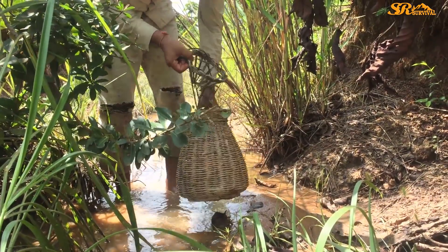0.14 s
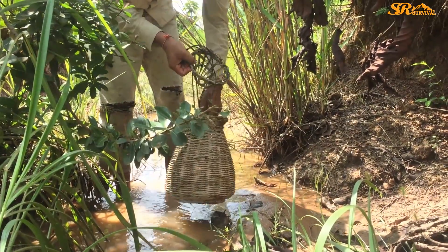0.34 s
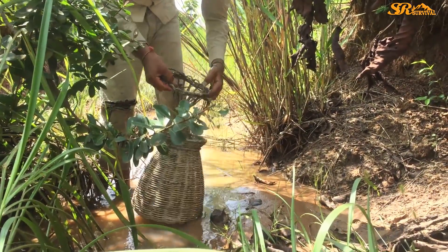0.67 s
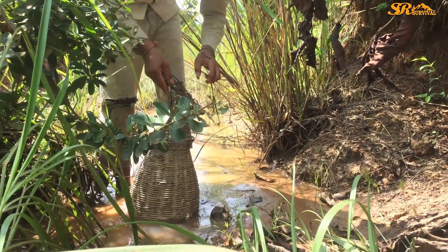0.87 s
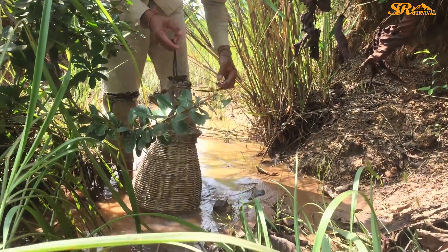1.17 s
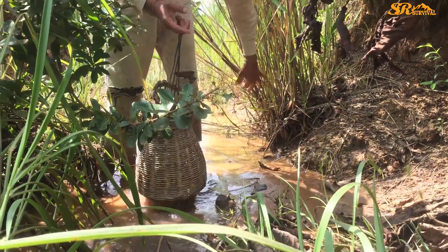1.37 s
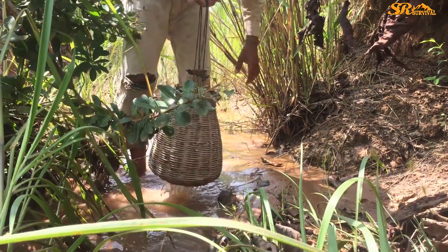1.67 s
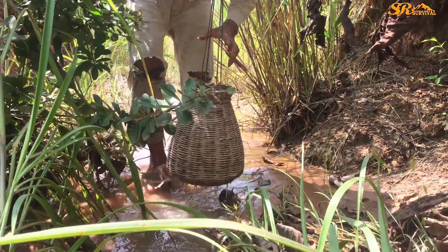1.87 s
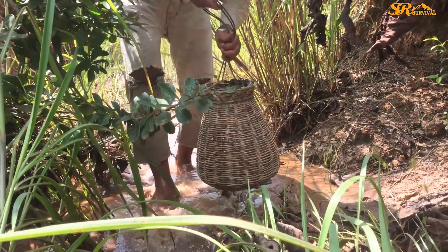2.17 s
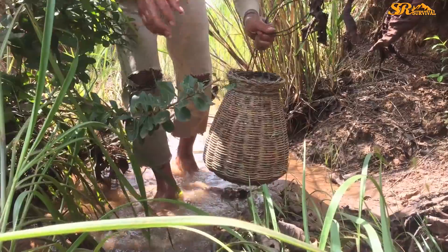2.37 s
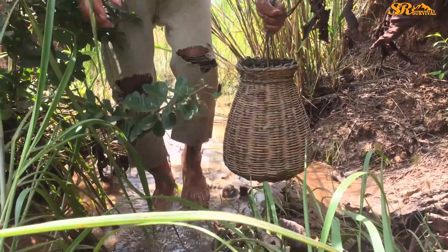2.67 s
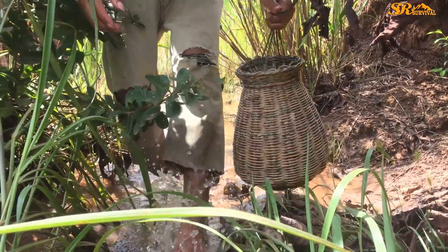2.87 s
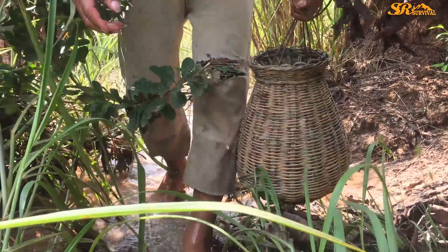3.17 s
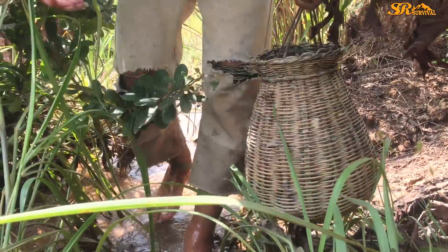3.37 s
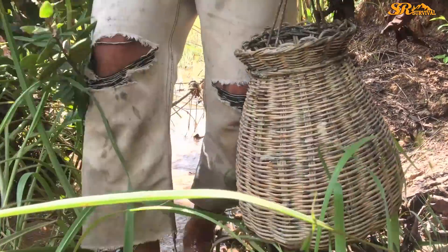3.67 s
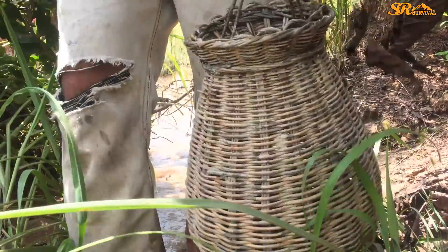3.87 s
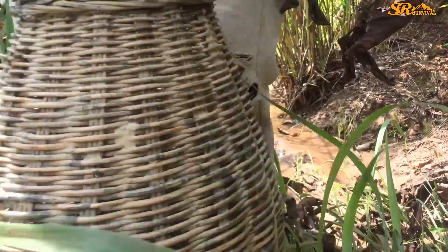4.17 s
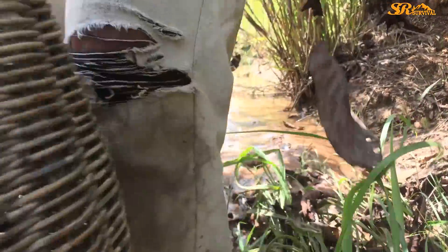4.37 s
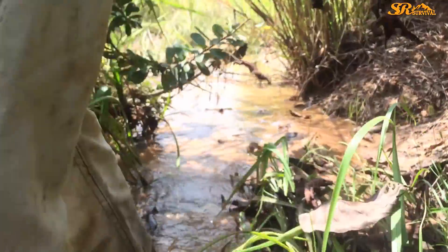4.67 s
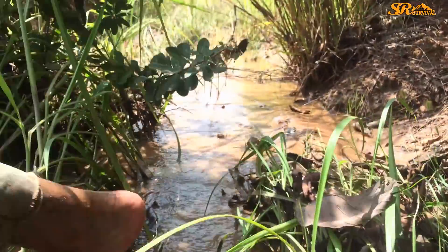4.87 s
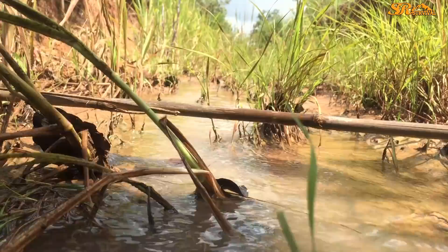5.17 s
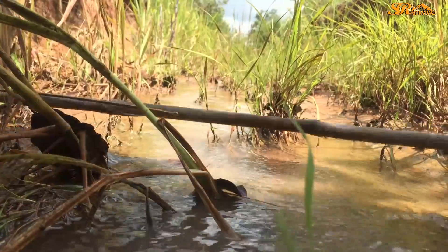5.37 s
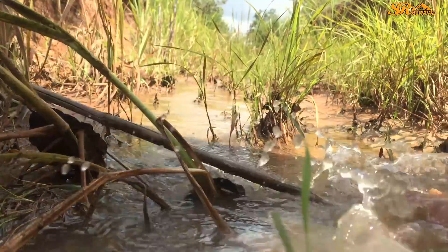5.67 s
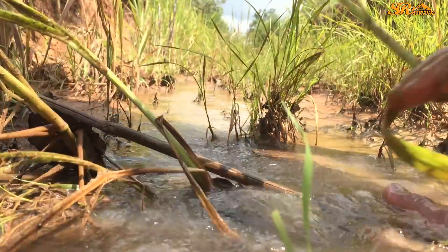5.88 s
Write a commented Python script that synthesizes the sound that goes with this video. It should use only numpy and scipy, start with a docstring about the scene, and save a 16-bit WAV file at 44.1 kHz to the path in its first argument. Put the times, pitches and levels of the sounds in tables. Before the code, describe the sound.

Sparse snaps and splashes build into busy wading past the microphone, followed by a quieter spot and one sharp crackling stem crush with a wet splash.

```python
"""Wading through a muddy ditch

Bare feet wade through shallow water between grass, a wicker basket in hand; a foot crushes reeds at the end.
Gliding sines make the bubbles and the mud's gulp; crowds of them make slosh, and with hiss they make spray.
Filtered noise bursts make snaps, splashes and dull knocks; short damped rings make cracks.
Far off a one-cylinder engine chugs in low thumps, over an outdoor hush of coloured noise."""
import sys
import numpy as np
from scipy import signal
from scipy.fft import rfft, irfft
from scipy.io import wavfile
from scipy.ndimage import uniform_filter1d

SR = 44100
rng = np.random.default_rng(int(sys.argv[2]) if len(sys.argv) > 2 else 0)


def master(y):
    """Save y as 16-bit WAV."""
    cut = np.clip(np.atleast_2d(y).T, -1, 1)
    pcm = np.round(cut * 32767)  # scale
    wavfile.write(sys.argv[1], SR, pcm.astype(np.int16))


N = 266364  # length in samples
SCENE_CHANGE_S = 5.28  # from here on the scene changes: a different hush, with surges of its own


def gain_of(db):
    """Turns decibels into an amplitude factor."""
    return 10 ** (np.asarray(db) / 20)


def evened(x):
    """Scales a signal to an RMS (average strength) of one."""
    return x / np.sqrt(np.mean(x ** 2) + 1e-20)


def add(mix, start_s, sound):
    """Adds a sound to the mix in place, cut off where the mix ends."""
    start = round(start_s * SR)
    part = mix[start:][:len(sound)]
    part += sound[:len(part)]


def coloured(x, spectrum):
    """Filters x by a spectrum of (pitch_hz, level_db) points, then evens its strength."""
    hz, db = np.transpose(spectrum)
    bins_hz = np.fft.rfftfreq(len(x), 1 / SR)
    curve_db = np.interp(np.log(bins_hz + 1), np.log(hz + 1), db)
    return evened(irfft(rfft(x) * gain_of(curve_db), len(x)))


def smooth_noise(samples):
    """Slow random ups and downs: noise averaged over a number of samples."""
    return evened(uniform_filter1d(rng.standard_normal(N), size=samples))


def clicks(per_s, spread_db):
    """Sparse random impulses, most small and a few large."""
    size = gain_of(spread_db * np.minimum(rng.exponential(1, N), 4))
    sign = rng.choice([-1, 1], N)
    return size * sign * (rng.random(N) < per_s / SR)


def bubble(hz, width_ms, glide, rough=0):
    """A sine under a bell that rises faster than it dies; the pitch glides by so many octaves per width."""
    # Time counted in widths, with the bell's peak in the middle of the array
    u = np.arange(-1.5 * width_ms * SR // 1000, 1.494 * width_ms * SR // 1000) * 1000 / SR / width_ms
    noise = rng.standard_normal((2, 8192))
    wobble = evened(uniform_filter1d(noise, size=round(SR / hz)))[:, :len(u)]
    bell = np.exp(-np.where(u < 0, 6.0, 2.2) * u ** 2) * (1 + rough * wobble[0])
    pitch_hz = hz * 2 ** (glide * u + 0.37 * rough * wobble[1])
    return bell * np.sin(2 * np.pi * np.cumsum(pitch_hz) / SR)


def air():
    """Outdoor hush as coloured noise that swells a little and changes with the scene."""
    # Tone of the hush and engine drone in the first scene: pitch_hz [Hz], level_db [dB per Hz]
    first_spectrum = [(25, -20), (60, -4.5), (100, -13), (150, -2), (190, -17.5), (230, -22.5),
                      (330, -21.5), (500, -30), (1000, -28.5), (2500, -31), (5000, -52), (10000, -45),
                      (16000, -36.5)]
    # Loudness of that hush over time: time_s [s], level_db [dB]
    first_levels = [(0, -62), (3, -62.5), (4.5, -60), (5.27, -54.5)]
    # Tone of the hush in the second scene: pitch_hz [Hz], level_db [dB per Hz]
    second_spectrum = [(30, -21), (70, -11), (150, -1.5), (220, -6), (300, -18), (1500, -17), (2500, -36),
                       (16000, -24)]
    second_db = -56
    t = np.arange(N) / SR
    swell = gain_of(4.05 * smooth_noise(3000))
    first_db = np.interp(t, *np.transpose(first_levels))
    first = gain_of(first_db) * coloured(rng.standard_normal(N), first_spectrum)
    second = gain_of(second_db) * coloured(rng.standard_normal(N), second_spectrum)
    later = np.clip((t - SCENE_CHANGE_S) / 0.044, 0, 1)  # a quick crossfade
    return swell * ((1 - later) * first + later * second)


def surging():
    """Slosh dB, bubble pitch in octaves and rustle dB at every sample; overlapping surges add their power."""
    # Surges of water round feet and basket: start_s [s], length_s [s], slosh_db [dB],
    # commonest bubbles at first_hz [Hz] and at last_hz [Hz], spray and leaf rustle spray_db [dB]
    surges = [(0.375, 0.13, -52, 900, 1100, -63), (0.897, 0.037, -50, 1500, 1690, -49.5),
              (1.004, 0.24, -56.5, 1560, 1570, -67), (1.483, 0.057, -53, 1010, 1410, -71),
              (1.649, 0.13, -45, 1500, 900, -60), (1.999, .16, -47, 1230, 1220, -57),
              (2.186, 0.091, -47, 700, 1110, -52.5), (2.301, 0.16, -38.5, 870, 1070, -48.5),
              (2.513, 0.049, -61, 1900, 1900, -52.5), (2.617, 0.032, -53, 1300, 1200, -70),
              (2.69, 0.062, -45.5, 1080, 860, -57.5), (2.796, 0.1, -57.5, 1210, 1800, -63.5),
              (2.953, 0.16, -45.5, 920, 1590, -49), (3.202, .15, -43.5, 1820, 1310, -43),
              (3.47, 0.09, -39.5, 1280, 1330, -48), (3.6, 0.17, -47.5, 1600, 1400, -48),
              (3.784, 0.14, -35, 1760, 630, -40.5), (3.983, 0.11, -39, 1380, 1830, -41.5),
              (4.123, 0.22, -46, 1480, 1700, -44), (4.331, 0.19, -35, 1300, 950, -42.5),
              (4.571, 0.21, -35, 1240, 1410, -42), (4.838, 0.22, -43, 1560, 1300, -52),
              (5.048, 0.051, -45.5, 780, 800, -48), (5.113, .13, -51, 1300, 1500, -54),
              (5.29, 0.12, -57, 990, 800, -84), (5.412, 0.12, -55, 800, 900, -58),
              (5.609, 0.12, -54, 990, 1200, -47), (5.705, 0.041, -30.5, 1530, 1300, -42.5),
              (5.815, 0.12, -49, 1200, 1280, -51.5), (6.003, 0.072, -64, 900, 950, -48)]
    # Each surge swells, then weakens while it lasts; afterwards the spray lingers longer
    slosh_swell_db_per_s, spray_swell_db_per_s, droop_db = 400, 198, 3.5
    slosh_fall_db_per_s, spray_fall_db_per_s = 356, 90
    still_slosh_db, still_rustle_db = -77, -71.5
    start, length, slosh_db, first_hz, last_hz, spray_db = np.transpose(surges)[:, :, None]
    t = np.arange(0, N, step=32) / SR
    before = np.maximum(start - t, 0)
    done = np.clip((t - start) / length, 0, 1)
    after = np.maximum(t - start - length, 0)
    here = (start < SCENE_CHANGE_S) == (t < SCENE_CHANGE_S)  # each scene hears only its own surges
    water_db = slosh_db - slosh_swell_db_per_s * before - droop_db * done - slosh_fall_db_per_s * after
    mist_db = spray_db - spray_swell_db_per_s * before - droop_db * done - spray_fall_db_per_s * after
    # Doubled decibels give power instead of amplitude
    water = here * gain_of(2 * water_db) + gain_of(2 * still_slosh_db) / len(surges)
    spray = (here * gain_of(2 * mist_db)).sum(axis=0) + gain_of(2 * still_rustle_db)
    # The strongest surge has most say in the pitch
    octaves = np.log2(first_hz * (last_hz / first_hz) ** done)
    octave = (water * octaves).sum(axis=0) / water.sum(axis=0)
    controls = 10 * np.log10(water.sum(axis=0)), octave, 10 * np.log10(spray)
    return [np.interp(np.arange(N) / SR, t, control) for control in controls]


def slosh(level_db, octave):
    """Small bubbles, sparse in a trickle and crowded in a rush; sizes gather round the pitch the stride sets free."""
    out = np.zeros(N)
    per_s = np.clip(45 * gain_of(.6 * (level_db + 46.0)), 25, 110)
    for hz in np.geomspace(280, 7000, num=36):
        above = np.log2(hz) - octave
        share = np.exp(-.5 * (above / np.where(above > 0, 1.1, .6)) ** 2)  # small bubbles outnumber large ones
        width_ms = 1000 * rng.uniform(3.5, 11) / hz
        ring = bubble(hz, width_ms, rng.uniform(-0.047, 0.25), rough=0.17)
        starts = clicks(per_s, 3.84) * share / np.sqrt(per_s)
        out += signal.oaconvolve(starts, ring / np.linalg.norm(ring), "same")
    flutter = gain_of(2.78 * smooth_noise(900))
    return gain_of(level_db) * evened(out * flutter)


def rustle(level_db):
    """Spray and brushed leaves: a hiss that comes in clumps, with tiny droplets pinging in it."""
    # Tone of the rustle: pitch_hz [Hz], level_db [dB per Hz]
    rustle_spectrum = [(710, -13.5), (1200, -12), (1430, -9), (2450, -1.5), (2790, -11), (3290, -4.5),
                       (7570, -12.5), (11600, -15.5), (16000, -19.5)]
    clumps = gain_of(2.35 * smooth_noise(400))
    drops = np.zeros(N)
    for hz in np.geomspace(1800, 11000, num=14):
        ping = bubble(hz, 1000 * rng.uniform(3.91, 12) / hz, rng.uniform(0, 0.12))
        drops += signal.oaconvolve(clicks(40, 4.1), np.sqrt(hz) * ping / np.linalg.norm(ping), "same")
    hiss = clumps * rng.standard_normal(N)
    return gain_of(level_db) * coloured(hiss + 0.43 * evened(drops), rustle_spectrum)


def burst(db, hz, fade_s, treble_db):
    """Splinters or spray as noise through the broad resonance of what gives way; long bursts swell slower."""
    t = np.arange(round(fade_s * SR)) / SR
    noise = rng.standard_normal((2, SR // 4))
    uneven = gain_of(2.6 * evened(uniform_filter1d(noise[1], size=90)))
    envelope = (1 - np.exp(-t / (0.021 * fade_s))) * gain_of(-60 * t / fade_s)
    grains = (noise[0] * uneven)[:len(t)] * envelope
    body_band = signal.butter(N=2, Wn=[hz / 1.76, hz * 1.79], btype="band", fs=SR, output="sos")
    body = signal.sosfilt(body_band, grains)
    treble = signal.lfilter(*signal.butter(N=1, Wn=[3000, 10000], btype="band", fs=SR), grains)
    sound = evened(body) + gain_of(treble_db) * evened(treble)
    return gain_of(db) * sound / abs(sound).max()


def add_snaps(mix):
    """Dry stems, leaves and wicker give way in bursts with treble about as strong as the body."""
    # Snaps: start_s [s], peak_db [dB], body pitch_hz [Hz], fade_s [s to fall by 60 dB]
    snaps = [(.034, -47.5, 5000, .025), (.135, -39, 2540, 0.065), (.175, -45, 2900, .062),
             (.208, -33, 760, 0.044), (.223, -33.5, 2550, .064), (.297, -43, 3400, 0.028),
             (.346, -43, 2020, 0.035), (.391, -28, 930, 0.047), (.455, -27.5, 1300, 0.086),
             (.538, -32, 1100, 0.049), (.831, -39, 2160, .21), (.915, -31, 1320, 0.07),
             (.972, -35.5, 2380, 0.043), (1.042, -45, 2670, 0.032), (1.076, -42, 8000, 0.027),
             (1.088, -35, 2980, 0.062), (1.104, -34, 6900, 0.093), (1.24, -36, 4600, .025),
             (2.141, -33, 1580, 0.058), (2.391, -33.5, 2770, .037), (2.604, -31.5, 5500, 0.044),
             (2.983, -34, 845, 0.082), (3.146, -28.5, 5470, 0.12), (3.247, -25, 5030, 0.14),
             (3.364, -37.5, 3680, 0.05), (3.499, -22.5, 1310, 0.16), (3.708, -27.5, 4200, 0.091),
             (3.991, -25, 1470, 0.088), (4.052, -23, 2540, 0.22), (4.484, -26, 2250, .029),
             (4.789, -23, 1900, 0.14), (5.7215, -4.5, 6470, 0.021), (5.739, -16.5, 2050, 0.024),
             (5.786, -22, 5030, 0.021), (5.7945, -13, 3900, .03), (5.878, -27.5, 1160, 0.024),
             (5.991, -36, 786, 0.2)]
    for start_s, peak_db, pitch_hz, fade_s in snaps:
        add(mix, start_s, burst(peak_db, pitch_hz, fade_s, treble_db=-0.5))


def engine():
    """Each firing sends two or three cycles of the exhaust note, with a weak overtone."""
    # Engine speed over time: time_s [s], speed [firings per s]
    speeds = [(0, 6.845), (2.98, 6.845), (4.1, 7.48), (6.1, 7.49)]
    # Loudness as carried by the wind, with deep dips where the engine misfires: time_s [s], peak_db [dB]
    levels = [(0, -53), (.8, -50), (1.15, -44.5), (1.45, -57), (1.75, -50), (2.1, -55), (2.3, -45),
              (2.55, -49), (2.8, -56), (3.2, -44.5), (3.7, -44), (4.35, -42.5), (4.65, -56), (4.8, -47.5),
              (5.2, -43.5)]
    exhaust_hz, width_ms = 76.7, 26.75
    uneven_db = 1  # typical random difference from firing to firing
    t = np.arange(.06, 5.2, 1 / SR)  # seconds over which it is heard
    turns = np.cumsum(np.interp(t, *np.transpose(speeds))) / SR
    times = np.interp(np.arange(int(turns[-1]) + 1), turns, t)  # one firing per whole count
    detune = rng.uniform(0.908, 1.11, (len(times), 2))
    levels_db = np.interp(times, *np.transpose(levels)) + uneven_db * rng.standard_normal(len(times))
    out = np.zeros(N)
    for middle_s, db, (low, high) in zip(times, levels_db, detune):
        note = bubble(exhaust_hz * low, width_ms, 0)
        overtone = bubble(2 * exhaust_hz * high, width_ms, 0)
        thump = note + 0.1 * overtone
        add(out, middle_s - len(thump) / 2 / SR, gain_of(db) * thump)
    return out


def knock(db, hz, fade_s):
    """A soft blow: low noise that dies in a wide, hollow resonance."""
    t = np.arange(round(fade_s * SR)) / SR
    envelope = gain_of(-60 * t / fade_s) * (1 - np.exp(-t / 0.0014))
    push = rng.standard_normal(SR // 4)[:len(t)] * envelope
    hollow = signal.butter(N=2, Wn=[hz / 3.5, hz * 2.0], btype="band", fs=SR, output="sos")
    thud = signal.sosfilt(hollow, push)
    return gain_of(db) * thud / abs(thud).max()


def add_knocks(mix):
    """The basket and feet on mud knock dully; the faint 55 Hz row is a lone deep thump."""
    # Knocks: start_s [s], peak_db [dB], pitch_hz [Hz], fade_s [s to fall by 60 dB]
    knocks = [(.138, -43.5, 413, 0.071), (.209, -39.5, 112, 0.04), (.226, -40.5, 305, .1),
              (.39, -32.5, 147, 0.061), (.42, -38, 340, 0.21), (.455, -40, 369, 0.091),
              (.541, -42.5, 134, 0.075), (1.108, -43, 172, 0.053), (1.579, -46, 175, 0.097),
              (4.499, -33.5, 226, 0.11), (4.575, -33.5, 221, 0.2), (4.742, -37.5, 140, 0.066),
              (5.334, -40.5, 111, 0.03), (5.444, -28.5, 213, 0.025), (5.697, -36.5, 238, 0.11),
              (5.719, -33, 167, 0.12), (5.73, -64, 55, .12), (5.795, -40, 213, 0.11)]
    for start_s, peak_db, pitch_hz, fade_s in knocks:
        add(mix, start_s, knock(peak_db, pitch_hz, fade_s))


def add_splashes(mix):
    """Water bursts into spray like the snaps, but duller."""
    # Splashes: start_s [s], peak_db [dB], body pitch_hz [Hz], fade_s [s to fall by 60 dB]
    splashes = [(.371, -38, 2700, 0.21), (.845, -33.5, 3680, 0.071), (.987, -40, 2030, 0.03),
                (1.102, -27.5, 1390, 0.13), (1.185, -35, 1480, .066), (1.324, -43, 2580, 0.048),
                (1.46, -45.5, 710, 0.22), (1.58, -32.5, 885, 0.064), (1.643, -27, 1530, 0.15),
                (2.726, -40, 960, 0.19), (2.906, -24, 3660, 0.082), (2.928, -26, 1790, 0.23),
                (3.112, -25, 1720, 0.16), (3.177, -24.5, 2460, 0.12), (3.299, -26, 1870, 0.14),
                (3.411, -36.5, 3040, 0.055), (3.757, -25, 2200, .21), (4.194, -35.5, 925, 0.2),
                (4.335, -30, 2100, 0.17), (4.731, -20.5, 2690, 0.18), (4.876, -21.5, 1780, 0.047),
                (4.908, -27.5, 2120, .035), (4.986, -22, 1690, 0.033), (5.7105, -10.5, 5940, 0.026)]
    for start_s, peak_db, pitch_hz, fade_s in splashes:
        add(mix, start_s, burst(peak_db, pitch_hz, fade_s, treble_db=-15))


def crack(db, hz):
    """A heavily damped ring; so small a source radiates no bass."""
    cycles = np.arange(round(6 * SR / hz)) * hz / SR
    ring = np.exp(-1.0 * cycles) * np.sin(2 * np.pi * cycles)
    ring = signal.lfilter(*signal.butter(N=2, Wn=hz / 3, btype="high", fs=SR), ring)
    return gain_of(db) * ring / abs(ring).max()


def add_cracks(mix):
    """Dry stems crack sharply and single drops slap."""
    # Cracks and slaps: start_s [s], peak_db [dB], pitch_hz [Hz]
    cracks = [(.3925, -28, 1500), (.4562, -22, 2300), (1.1035, -26, 2500), (1.2405, -35, 5000),
              (2.3922, -23, 2900), (2.9282, -20, 2400), (3.5035, -23, 3200), (3.711, -27, 4600),
              (4.0518, -21, 2800), (4.486, -24, 8000), (4.8772, -17, 2400), (4.9872, -15, 2200),
              (5.4455, -27, 700), (5.7004, -2, 6000), (5.7138, -8, 4800), (5.7222, -2, 7000),
              (5.7415, -15, 6000), (5.7995, -15, 4500)]
    for start_s, peak_db, pitch_hz in cracks:
        add(mix, start_s, crack(peak_db, pitch_hz))


def add_ring(mix, middle_s, db, hz, width_ms, glide):
    """Places one slightly rough bubble with its peak at middle_s."""
    ring = bubble(hz, width_ms, glide, rough=0.19)
    add(mix, middle_s - len(ring) / 2 / SR, gain_of(db) * ring)


def add_bubbles(mix):
    """Single bubbles and droplets ring with a rising pitch; hard impacts ring for fewer cycles."""
    # Bubbles and droplets: middle_s [s], peak_db [dB], pitch_hz [Hz]
    bubbles = [(1.11, -34.5, 1360), (1.121, -33.5, 1820), (1.174, -30.5, 1604), (1.192, -42, 725),
               (1.587, -40, 775), (1.714, -36, 1052), (1.76, -42.5, 710), (1.999, -41, 1073),
               (2.061, -34.5, 1070), (2.09, -39, 1160), (2.177, -38, 371), (2.228, -39, 577),
               (2.318, -35.5, 823), (2.345, -29, 790), (2.446, -36, 728), (2.728, -35, 855),
               (2.917, -44.5, 606), (2.929, -20, 1840), (2.975, -39.5, 786), (3.162, -29.5, 1196),
               (3.317, -42, 1000), (3.339, -39.5, 884), (3.483, -29.5, 1640), (3.512, -47, 395),
               (3.842, -27, 1267), (3.881, -35.5, 750), (3.898, -44, 419), (3.931, -39, 585),
               (4.086, -31, 1880), (4.37, -29.5, 1210), (4.412, -33.5, 606), (4.465, -31, 379),
               (4.574, -34, 933), (4.844, -37, 923), (4.882, -21.5, 1793), (4.992, -20, 1674),
               (5.056, -28, 730), (5.6966, -5, 2720), (5.6976, -7.5, 2930), (5.775, -35, 4230),
               (5.778, -28.5, 1430), (5.811, -24, 1590), (5.838, -38.5, 2980), (5.86, -48, 850),
               (5.886, -46.5, 1220), (5.901, -39, 1630), (5.906, -34.5, 5130)]
    for middle_s, peak_db, pitch_hz in bubbles:
        cycles = 9 * gain_of(.22 * (-35 - peak_db))  # 9 cycles wide at -35 dB
        add_ring(mix, middle_s, peak_db, pitch_hz, 1000 * cycles / pitch_hz, glide=.15)


def add_gulp(mix):
    """Mud lets go of the basket with one low, falling note."""
    # The gulp: middle_s [s], peak_db [dB], pitch_hz [Hz], width_ms [ms], glide [octaves per width]
    gulp = (1.848, -38, 165, 39, -0.75)
    add_ring(mix, *gulp)


def banks(x):
    """Grass banks and the water surface scatter a short tail of fading noise echoes."""
    t = np.arange(SR // 12) / SR
    tail = rng.standard_normal(len(t)) * gain_of(-60 * t / .055) * (t > .0012)
    return signal.oaconvolve(x, tail / np.linalg.norm(tail))[:N]


def scene():
    """Near sounds with their scatter off the banks, then the far engine and the air."""
    slosh_db, octave, rustle_db = surging()
    near = slosh(slosh_db, octave) + rustle(rustle_db)
    add_snaps(near)
    add_knocks(near)
    add_splashes(near)
    add_cracks(near)
    add_bubbles(near)
    add_gulp(near)
    mix = near + gain_of(-11.0) * banks(near) + engine() + air()
    return mix[None]  # one channel


def record(dry):
    """The small microphone drops the deepest bass; then the recorder's band limit cuts the highest treble."""
    bass_cut = signal.butter(N=3, Wn=42, btype="high", fs=SR, output="sos")
    thin = signal.sosfilt(bass_cut, dry)
    band_limit = signal.firwin(511, 15900, window=("kaiser", 9), fs=SR)  # low-pass at 15900 Hz
    return signal.oaconvolve(thin, band_limit[None], "same")


dry = scene()
out = record(dry)
master(out)
```